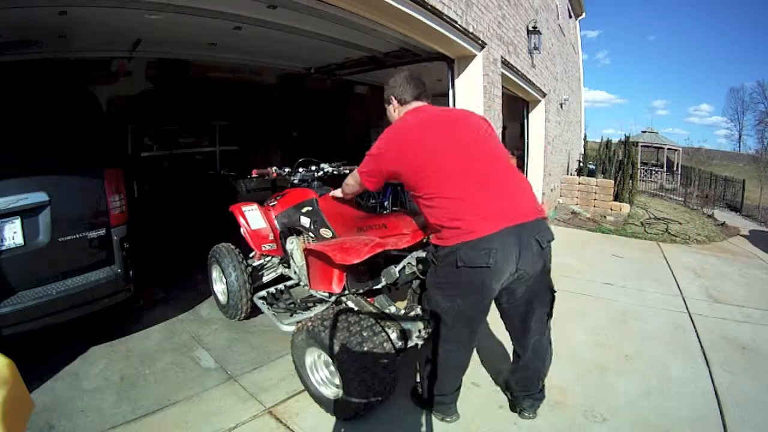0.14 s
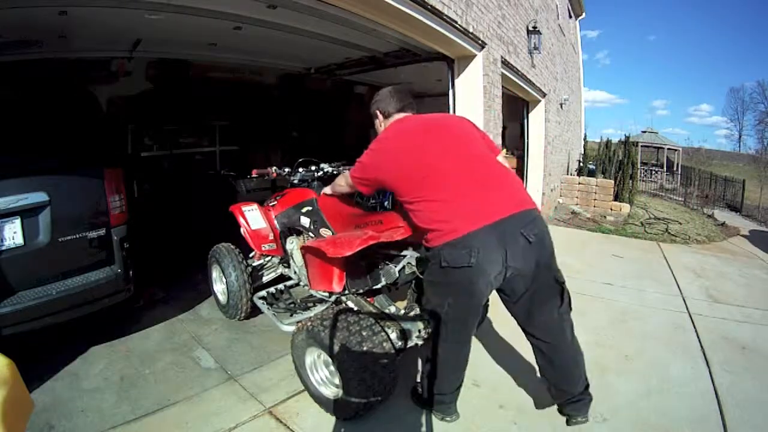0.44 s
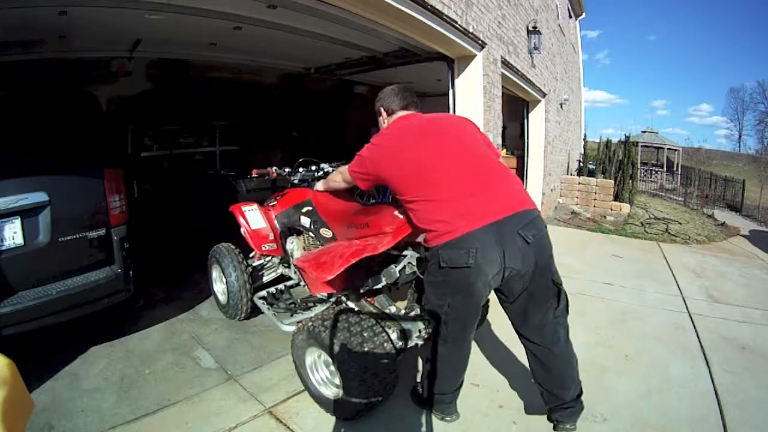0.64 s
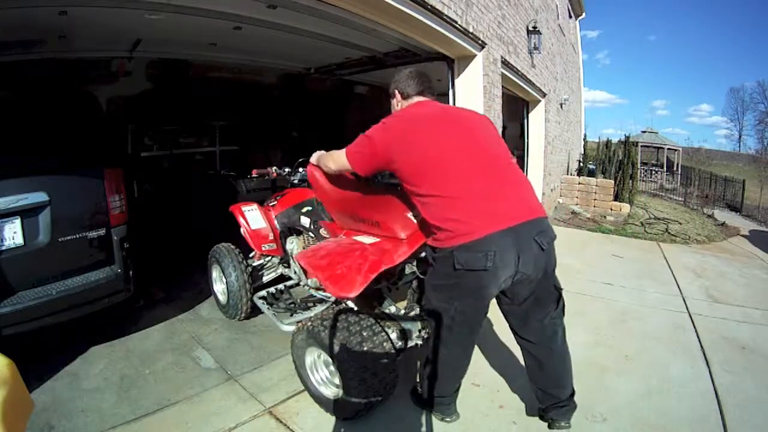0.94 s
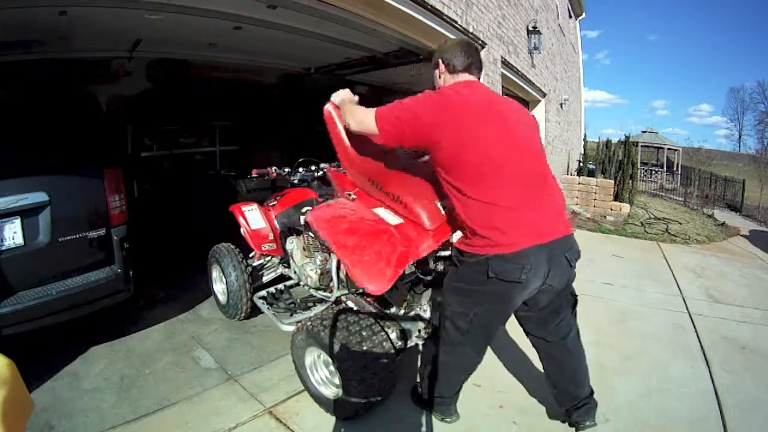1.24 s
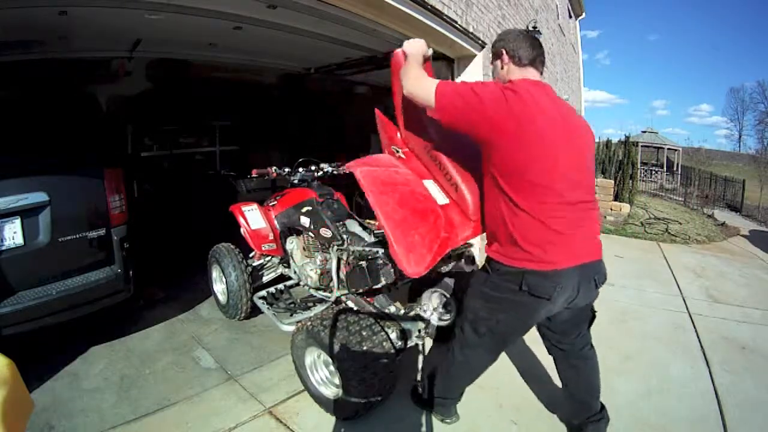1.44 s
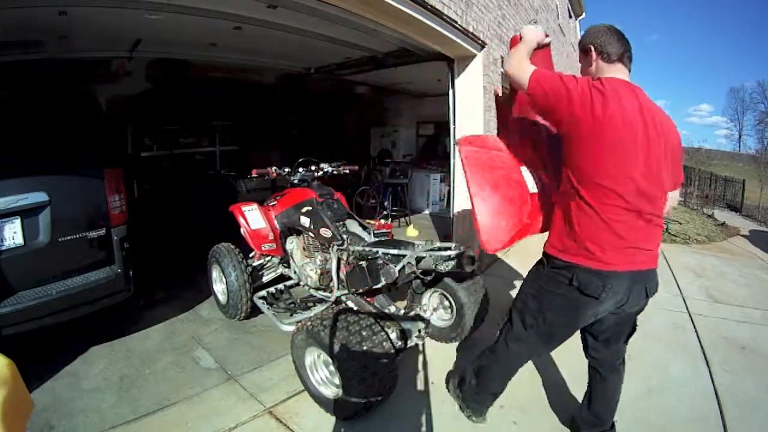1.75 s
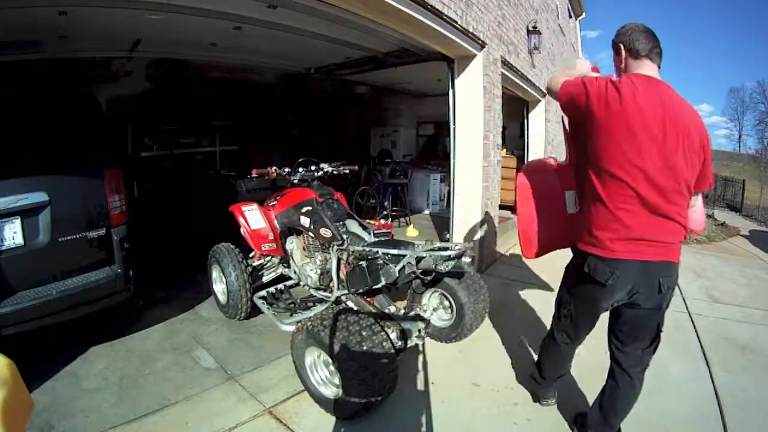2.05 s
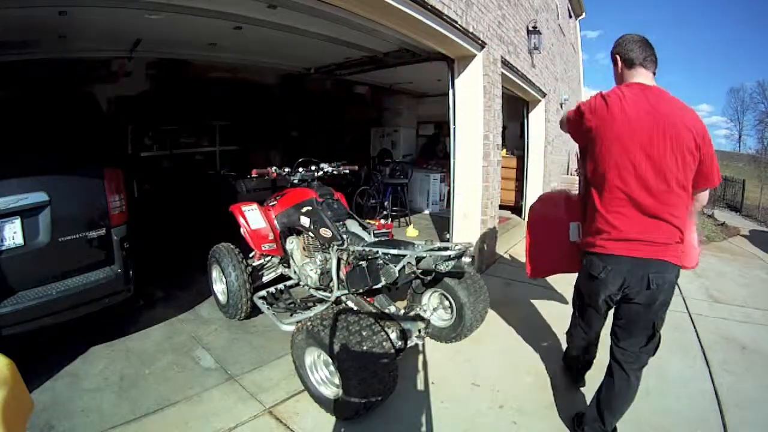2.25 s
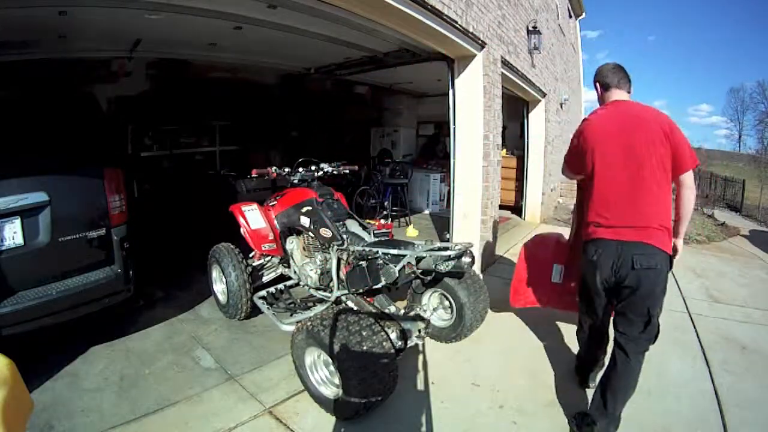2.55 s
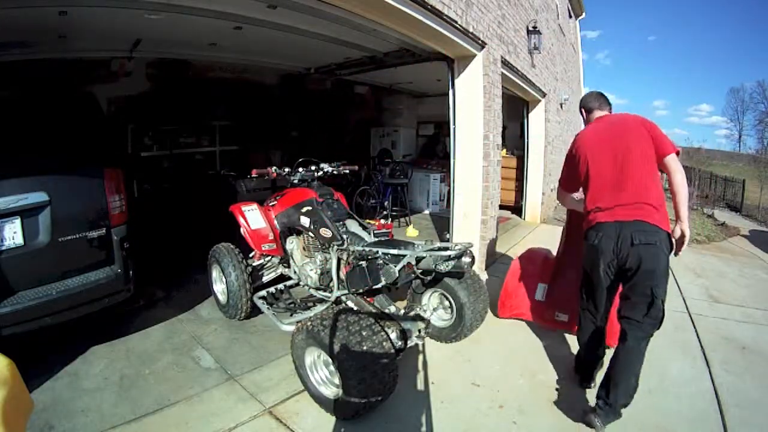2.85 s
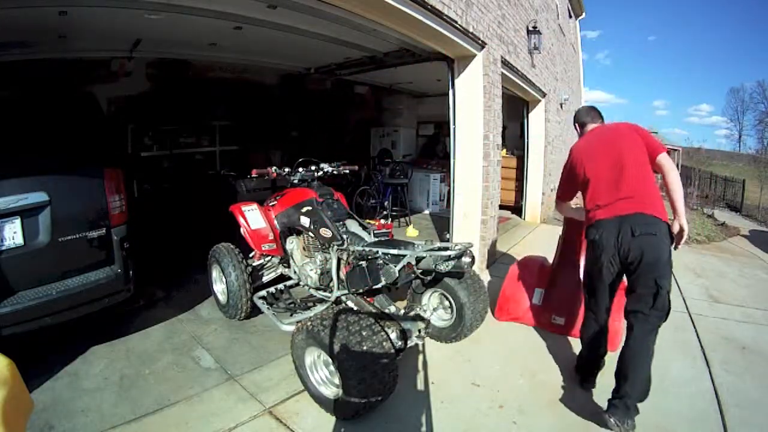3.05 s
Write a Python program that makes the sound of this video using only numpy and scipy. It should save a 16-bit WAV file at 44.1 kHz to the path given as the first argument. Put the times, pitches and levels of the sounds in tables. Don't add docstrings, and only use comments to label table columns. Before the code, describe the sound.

A hollow plastic panel is rubbed free with light clatter, then dropped loudly on a concrete driveway

```python
import sys
import numpy as np
from scipy import signal
from scipy.fft import rfft, irfft, next_fast_len
from scipy.io import wavfile
from scipy.ndimage import map_coordinates

SR = 44100
rng = np.random.default_rng(int(sys.argv[2]) if len(sys.argv) > 2 else 0)


def invert_db(x):
    u = np.asarray(x, float) / 20
    return 10 ** u


def generate_wav(sig):
    pcm = np.round(np.clip(np.atleast_2d(sig).T, -1, 1) * 32767).astype(np.int16)
    wavfile.write(sys.argv[1], SR, pcm)


N = 141120
SLOW_SR = 12000

# time_s, centre_hz
WHINE_PATH = [(0, 2740), (.7, 2770), (1.05, 2730), (1.6, 2830), (2.001, 2840), (2.251, 2750), (3.2, 2780)]


def unit(x):
    return x / np.sqrt(np.mean(x ** 2) + 1e-20)


def along(points, hz):
    f, v = np.transpose(points)
    return np.interp(np.log(hz + 1), np.log(f + 1), v)


def filtered(x, response):
    m = next_fast_len(len(x) + 8192)
    return irfft(rfft(x, m) * response(np.fft.rfftfreq(m, 1 / SR)), m)[:len(x)]


def coloured(x, spectrum):
    return unit(filtered(x, lambda hz: invert_db(along(spectrum, hz)) * (hz < SLOW_SR / 2)))


def resonance(f, hz, width_hz):
    return 1 / (1 + (2 * (f - hz) / width_hz) ** 2)


def wobble(knots_per_s):
    knots = rng.standard_normal(int(N * knots_per_s / SR) + 4)
    return map_coordinates(knots, [np.arange(N) * knots_per_s / SR])


def add(into, start_s, x):
    part = into[round(start_s * SR):][:len(x)]
    part += x[:len(part)]


def narrow(hz, width_hz):
    cosine, sine = [filtered(rng.standard_normal(N), lambda f: resonance(f, 0, width_hz)) for _ in range(2)]
    phase = 2 * np.pi * np.cumsum(hz * np.ones(N)) / SR
    return unit(cosine * np.cos(phase) + sine * np.sin(phase))


def outdoors():
    # freq_hz, level_db per Hz
    traffic = [(12, -37), (20, -5), (95, -1.5), (134, -7), (202, -9), (228, -13), (275, -13.5),
               (626, -16.5), (1200, -29), (1560, -30.5), (2640, -120)]
    # freq_hz, level_db per Hz
    air_spectrum = [(700, -33), (1000, -7.5), (2000, -2), (2800, 1.5), (3600, -5), (5000, -7.5),
                    (5600, -8.5), (5950, -15.5)]
    # centre_hz, width_hz, level_db
    drones = [(92.5, 83, -43), (200, 14, -47.5), (392, 20, -75), (606, 103, -54), (2290, 95, -67),
              (4690, 300, -71.5)]
    time_s, centre_hz = np.transpose(WHINE_PATH)
    t = np.arange(N) / SR
    whine_hz = np.interp(t, time_s, centre_hz) + 25 * wobble(12)
    whine = invert_db(-56 + wobble(35.9)) * narrow(whine_hz, width_hz=510)
    rumble_db = -39.5 + 0.19 * wobble(2.66) + 0.4 * wobble(16)
    rumble = invert_db(rumble_db) * coloured(rng.standard_normal(N), traffic)
    air_db = -55 + 0.2 * wobble(3.9) + 0.077 * wobble(29.3)
    air = invert_db(air_db) * coloured(rng.standard_normal(N), air_spectrum)
    hums = sum(invert_db(db) * narrow(hz, width_hz) for hz, width_hz, db in drones)
    return whine + rumble + air + hums


def peepers():
    peeps_per_s, peep_s, rise_hz_per_s = 80, .028, 750
    spread_hz, fade_db_per_s = 119 * 1.558, 1.5
    out, t = np.zeros(N + SR), np.arange(SR // 8) / SR
    swell = np.sin(np.pi * np.clip(t / peep_s, 0, 1)) ** 2
    for when, pitch, size in rng.random((round(peeps_per_s * N / SR), 3)):
        start_s = when * N / SR
        hz = np.interp(start_s, *np.transpose(WHINE_PATH)) + spread_hz * (2 * pitch - 1)
        peep = np.sin(2 * np.pi * (hz + rise_hz_per_s * t / 2) * t)
        add(out, start_s, invert_db(5.3 * size - fade_db_per_s * start_s) * swell * peep)
    return invert_db(-56.5) * unit(out[:N])


def drags():
    # start_s, rise_s, fall_s, level_db, brightness_db
    strokes = [(0.077, 0.015, 0.022, -39, 0), (0.482, 0.061, 0.11, -33.5, -1), (.66, 0.097, 0.29, -55.5, 1),
               (0.627, 0.0044, 0.072, -36.5, -2), (.77, 0.032, 0.091, -45.5, 4),
               (0.851, 0.07, 0.051, -45, -2.5), (1.599, 0.035, 0.03, -47, 6.5), (1.70, 0.036, 0.33, -53, 8),
               (2.33, 0.019, 0.046, -61, 11.5), (2.42, 0.063, 0.051, -51.5, 8),
               (2.53, 0.052, 0.24, -51, 7.5), (2.822, 0.064, 0.014, -39, 4.5),
               (3.023, 0.011, 0.03, -37.5, -13), (3.048, 0.011, 0.11, -31.5, 1),
               (3.157, 0.011, 0.033, -35, -6)]
    # freq_hz, level_db per Hz
    body = [(60, -43), (110, -36), (210, 3), (400, -6), (740, -1), (950, -8), (2000, -18), (3000, -33)]
    # freq_hz, level_db per Hz
    surface = [(880, -4.5), (1500, -8), (2150, -4.5), (2570, -3), (3310, -0.5), (3690, -8.5), (4560, -8),
               (5900, -39), (7670, -55), (13000, -120)]
    # freq_hz, level_db per Hz
    grit = [(3000, -8.5), (4200, -9), (5300, -0.5), (5900, -1.5)]
    surface_db, grit_db, grains_per_s, grain_spread_db = -5, -22, 1200, 3.5
    grains = (rng.random(N) < grains_per_s / SR) * invert_db(grain_spread_db * rng.standard_normal(N))
    slips = unit(grains * rng.choice([-1, 1], N)) + 0.87 * rng.standard_normal(N)
    low, high, fizz = (coloured(slips, spectrum) for spectrum in (body, surface, grit))
    out, t = np.zeros(N), np.arange(N) / SR
    for start_s, rise_s, fall_s, db, bright_db in strokes:
        peak_s = start_s + rise_s
        stroke = np.interp(t, [start_s, peak_s, peak_s + fall_s], [0, 1, 0]) ** 1.13
        rub = invert_db(-bright_db) * low + invert_db(surface_db) * high + invert_db(grit_db + 2 * bright_db) * fizz
        out += invert_db(db) * stroke * rub
    return out * invert_db(1.9 * wobble(60))


def squeals():
    # start_s, length_s, level_db, centre_hz, width_hz
    rubs = [(.085, .02, -52, 4850, 400), (.526, .03, -42, 3250, 250), (.53, .035, -36, 700, 200),
            (.555, .04, -35, 400, 200), (.564, .022, -40, 3280, 250), (.595, .02, -46, 3350, 250),
            (.633, .012, -40, 1350, 500), (.65, .045, -37, 310, 60), (.66, .06, -38, 100, 40),
            (.788, .02, -50, 4750, 300), (.795, .03, -49, 2750, 200), (.83, .025, -50, 2780, 200),
            (.906, .03, -45, 3300, 250), (.915, .06, -36, 115, 40), (3.02, .045, -21, 765, 30),
            (3.04, .035, -25, 950, 120), (3.046, .016, -28, 2300, 700), (3.08, .03, -37, 1130, 60),
            (3.165, .035, -25, 200, 50), (3.172, .02, -43, 2500, 400)]
    out, t = np.zeros(N), np.arange(SR // 10) / SR
    for start_s, length_s, db, hz, width_hz in rubs:
        noise = unit(filtered(rng.standard_normal(len(t)), lambda f: resonance(f, hz, width_hz)))
        swell = np.sin(np.pi * np.clip(t / length_s, 0, 1))
        add(out, start_s, invert_db(db) * noise * swell)
    return out


def shell(contacts, scatter_db):
    # freq_hz, level_db, t60_s
    modes = [(96.4, -18.5, 0.54), (119.2, -6, 0.3), (182, -4.5, 0.11), (208.6, -3.5, 0.18),
             (272.6, -9, 0.162), (315.5, -1, 0.21), (391.2, -5, 0.24), (431.4, -6, 0.17),
             (467.2, -5.5, 0.15), (505, -6, 0.13), (600, -14, 0.15), (674, -13, 0.24), (761, -4.5, 0.097),
             (872, -17, 0.097)]
    # freq_hz, level_db
    slap_spectrum = [(300, -20), (900, 28), (1400, -23), (2000, -16), (3200, -10), (4000, -27), (5800, -16)]
    thump_hz, thump_db, thump_t60_s = 250, 19.5, .019
    slap_t60_s, detune, relaxes_per_s, radiates_hz = .055, .014, .5, 110
    out, t = np.zeros(N), np.arange(SR // 2) / SR
    hz, level_db, t60_s = np.transpose(modes)[:, :, None]
    glide = 1 + relaxes_per_s * t / 2
    for start_s, db, hard in contacts:
        tilt_db = 8 * (hard - .5) * np.log2(hz / 300) + scatter_db * rng.standard_normal(hz.shape)
        bent_hz = hz * (1 + detune * rng.standard_normal(hz.shape))
        partials = invert_db(level_db + tilt_db - 60 * t / t60_s) * np.sin(2 * np.pi * bent_hz * t * glide)
        ring = np.sum(partials, axis=0)
        thump = invert_db(thump_db - 60 * t / thump_t60_s) * np.sin(2 * np.pi * thump_hz * t)
        slap_db = 23.8 * (hard - 1.5) - 60 * t / slap_t60_s
        slap = invert_db(slap_db) * coloured(rng.standard_normal(len(t)), slap_spectrum)
        onset = 1 - np.exp(-t / 0.0022)
        add(out, start_s, invert_db(db) * (slap - (ring + thump) * onset))
    return filtered(out, lambda f: (1j * f) ** 2 / (radiates_hz ** 2 - f * f + 1.2j * f * radiates_hz))


def ticks():
    # start_s, peak_db, centre_hz, width_hz
    taps = [(.0915, -37.5, 4800, 700), (.478, -29, 624, 277), (0.536, -38, 3250, 514),
            (0.55, -21, 795, 900), (0.5689, -49, 3180, 500), (.630, -24.5, 3300, 704),
            (0.6309, -32, 4460, 900), (.797, -55, 4700, 690), (.81, -54, 3000, 2000),
            (0.9122, -42, 3480, 600), (1.4544, -47, 4500, 900), (1.567, -41.5, 3730, 900),
            (1.6579, -35.5, 4400, 1600), (1.7132, -47, 4600, 900), (1.756, -34.5, 5100, 2500),
            (1.812, -38, 1410, 900), (1.88, -37, 1430, 900), (2.404, -29.5, 690, 392),
            (2.4086, -39.5, 3280, 900), (2.609, -37, 3300, 1250), (2.6509, -28.5, 3300, 1810),
            (2.727, -46, 4000, 1500), (2.808, -41, 2700, 510), (3.0448, -9, 1390, 1500),
            (3.076, -20, 1370, 1200), (3.076, -25, 4500, 3000), (3.1648, -27, 5410, 800)]
    out, t = np.zeros(N), np.arange(SR // 10) / SR
    swell = invert_db(-60 * t / 0.024) * (1 - np.exp(-t / 0.0015))
    for start_s, db, hz, width_hz in taps:
        burst = unit(filtered(rng.standard_normal(len(t)), lambda f: resonance(f, hz, width_hz)))
        tap = np.exp(-1.2 * width_hz * t) * np.sin(2 * np.pi * hz * t)
        add(out, start_s, invert_db(db + 2.5) * (tap + 0.5 * swell * burst))
    return out


def clacks():
    # start_s, level_db, t60_s
    strikes = [(.0935, -48, .006), (.5192, -40, .005), (.5425, -37, .005), (.5508, -29, .008),
               (.6302, -33, .006), (.7821, -45, .005), (1.6571, -45, .005), (1.7384, -46, .004),
               (1.7465, -45, .004), (1.7544, -43, .005), (1.7775, -47, .004), (1.7935, -47, .004),
               (2.3717, -47, .004), (2.5672, -45, .005), (2.6492, -33, .008), (2.8551, -44, .006),
               (3.0215, -22, .006), (3.0443, -14, .007), (3.0748, -21, .009), (3.1655, -34, .014)]
    # freq_hz, level_db per Hz
    edge_spectrum = [(300, -28), (1200, 3), (2500, -12), (4000, -20), (5900, -12)]
    out, t = np.zeros(N), np.arange(SR // 20) / SR
    for start_s, db, t60_s in strikes:
        noise = coloured(rng.standard_normal(len(t)), edge_spectrum)
        add(out, start_s, invert_db(db - 60 * t / t60_s) * noise)
    return out


def garage(x):
    # freq_hz, t60_s
    decay = [(100, 0.18), (500, 0.32), (2000, 0.34), (5500, 0.26)]
    delay_s = .012
    hz, t, z = signal.stft(rng.standard_normal(SR // 2), SR, nperseg=256)
    fade = invert_db(-60 * t / along(decay, hz)[:, None])
    tail = signal.istft(z * fade, SR, nperseg=256)[1]
    delayed = np.pad(x, (round(delay_s * SR), 0))
    return invert_db(-9.5) * signal.fftconvolve(delayed, tail / np.linalg.norm(tail))[:N]


def bird():
    # time_s, pitch_hz, level_db
    slides = [(1.70, 3480, -72), (1.72, 3440, -59), (1.78, 3300, -61), (1.84, 3200, -66), (1.92, 3350, -59),
              (1.97, 3240, -57), (2.05, 3130, -55), (2.09, 3040, -57), (2.2, 2850, -58)]
    time_s, pitch_hz, level_db = np.transpose(slides)
    t = np.arange(N) / SR
    phase = 2 * np.pi * np.cumsum(np.interp(t, time_s, pitch_hz)) / SR
    return invert_db(np.interp(t, time_s, level_db, -120, -120) + 2.1 * wobble(29.8)) * np.sin(phase)


def camera_case(x):
    # centre_hz, width_hz, lift_db
    housing = [(3100, 110, 1), (5100, 200, 2)]
    return filtered(x, lambda f: invert_db(sum(db * resonance(f, hz, width_hz) for hz, width_hz, db in housing)))


def scene():
    # start_s, strength_db, hardness (0-1)
    knocks = [(.0913, -56, 0.6), (.478, -48, 0.7), (.535, -30, 1), (.5425, -28, 0.98), (.551, -30, 0.1),
              (.634, -55, 0.5), (.648, -38, 0), (.675, -37.5, 0.44), (.790, -38, 0.1), (.866, -43.5, 0.4),
              (.916, -45, 1), (.926, -42, 0), (2.404, -56, 0.7), (2.6215, -48, 0.7)]
    # start_s, strength_db, hardness (0-1)
    landing = [
        (3.0203, -5, 0.49),
        (3.032, -25, 0.3),
        (3.0440, -6.5, 0.78),
        (3.0545, -8, 0.33),
        (3.0745, -20, 0.36),
        (3.118, -22.5, 0.3),
        (3.172, -27.5, 0),
    ]
    fender = shell(landing, scatter_db=2.0) + shell(knocks, scatter_db=3.5)
    fender = camera_case(fender + ticks() + drags() + clacks() + squeals())
    return (fender + garage(fender) + outdoors() + bird() + peepers())[None]


def top_cut(x):
    return signal.sosfilt(signal.butter(12, 16570, fs=SR, output="sos"), x)


def record(dry):
    hold, edge_hz, top_hz = 4, 5700, 15400
    soft = filtered(dry[0], lambda hz: 1 / np.sqrt(1 + (hz / edge_hz) ** 24))
    slow = np.clip(signal.resample(soft, N * SLOW_SR // SR), -1, 1)
    held = signal.resample(np.repeat(slow, hold), N)
    held = filtered(held, lambda hz: hz < top_hz)
    return top_cut(np.clip(held, -1, 1)[None])


dry = scene()
out = record(dry)
generate_wav(out)
```